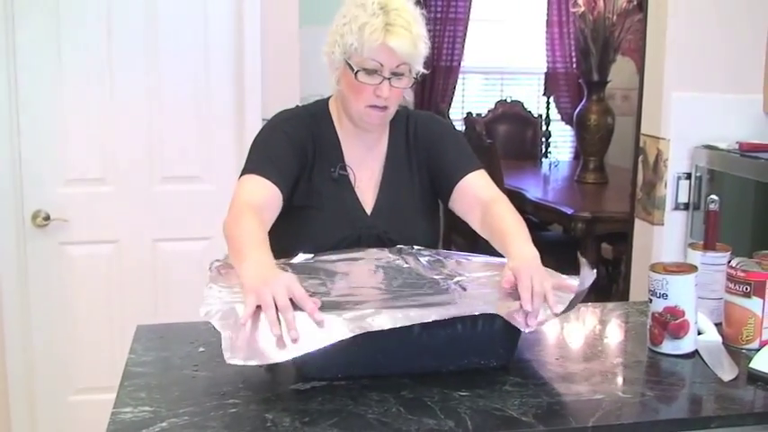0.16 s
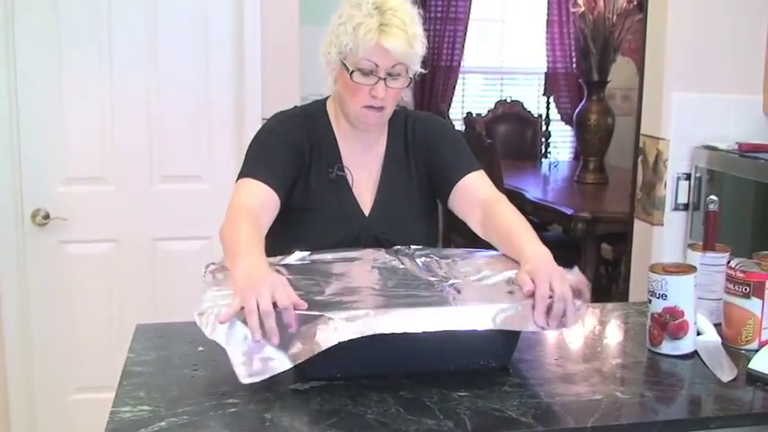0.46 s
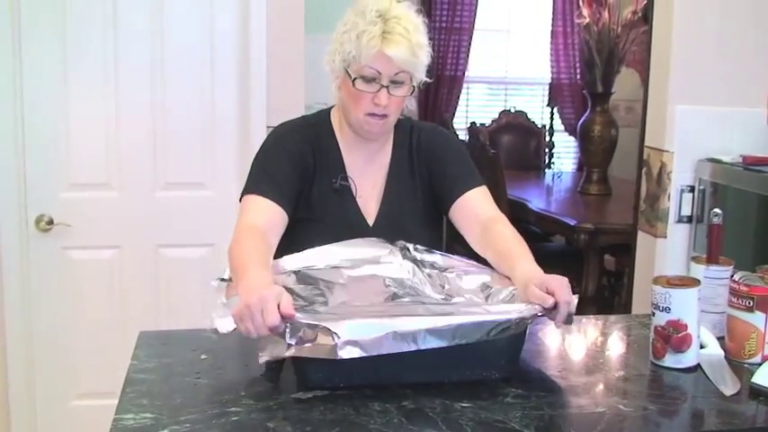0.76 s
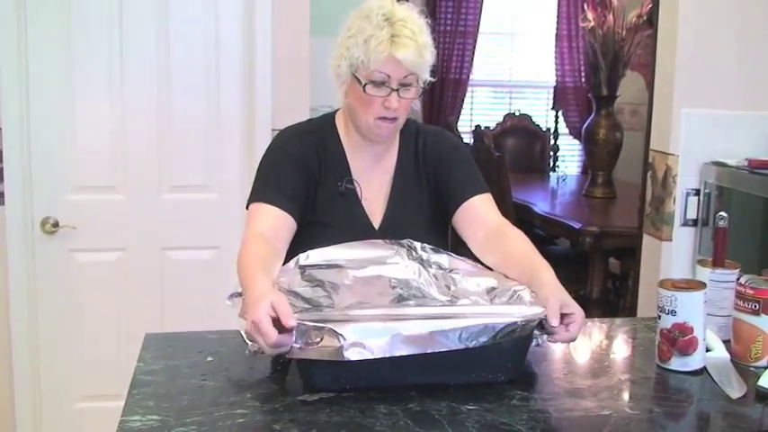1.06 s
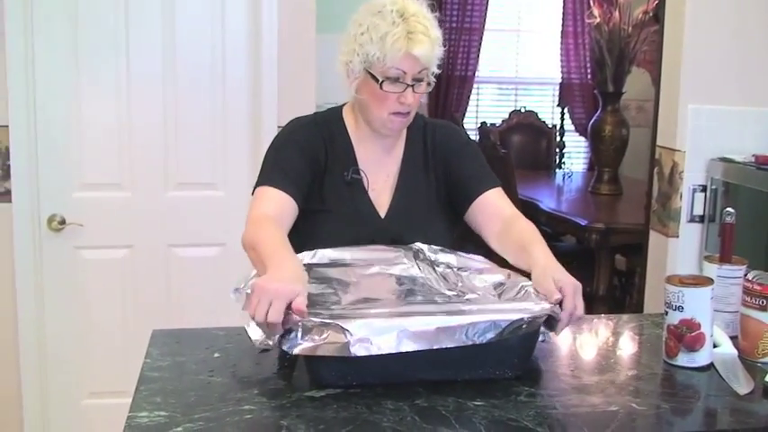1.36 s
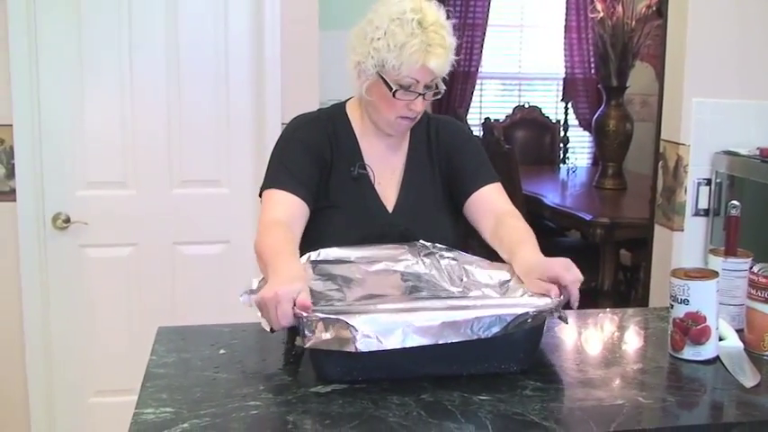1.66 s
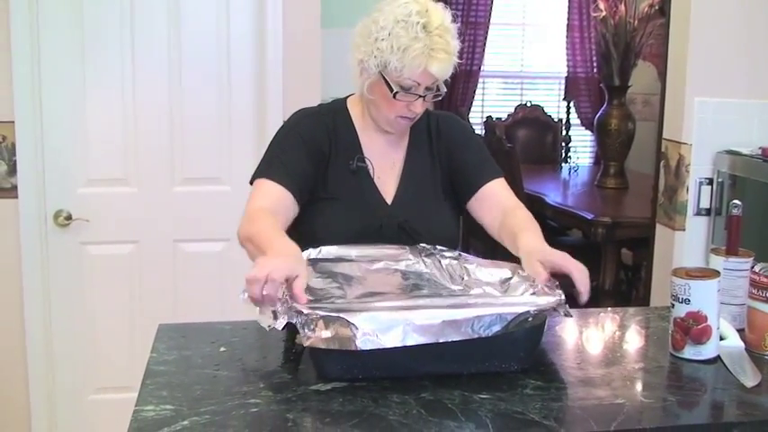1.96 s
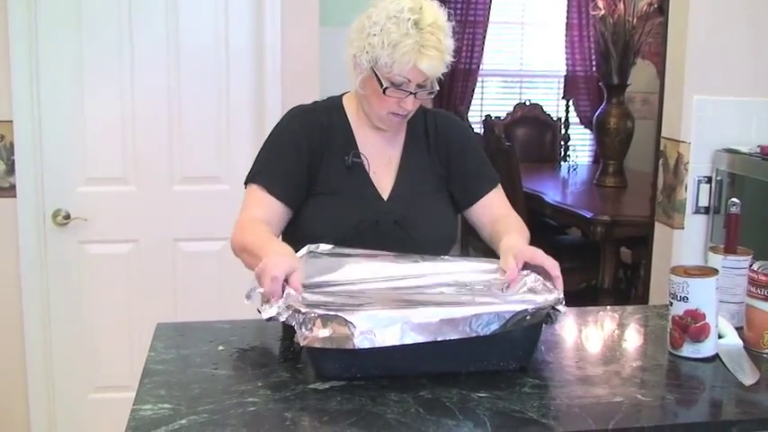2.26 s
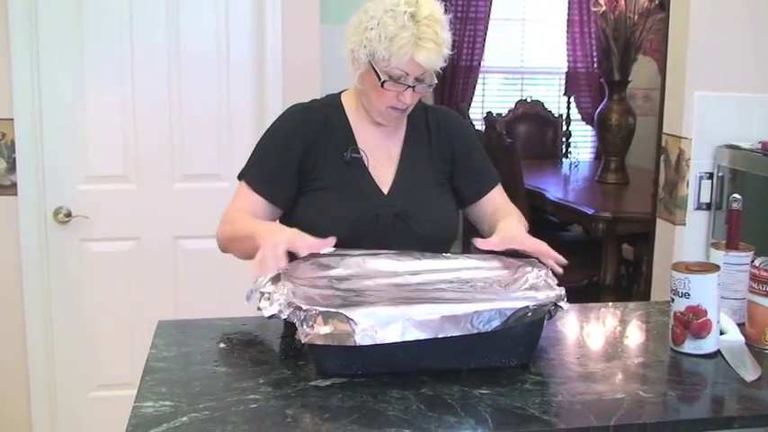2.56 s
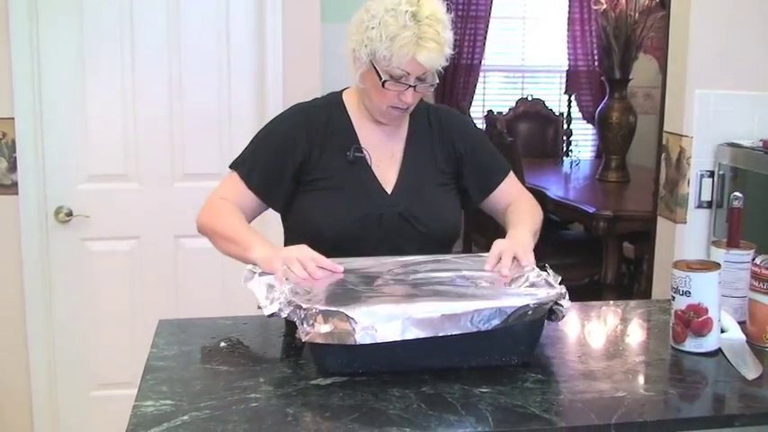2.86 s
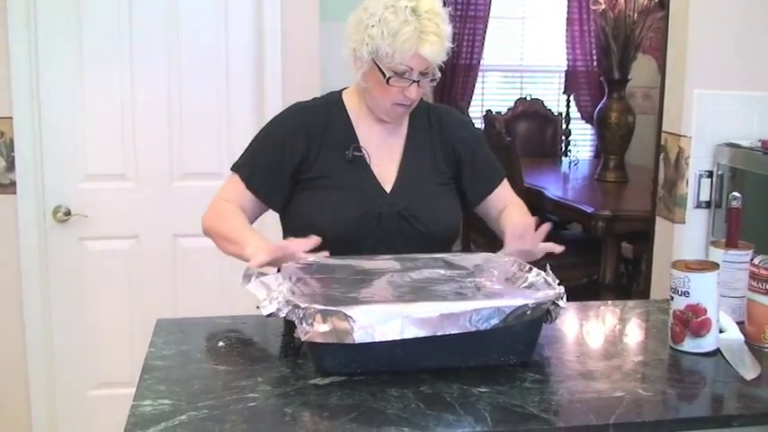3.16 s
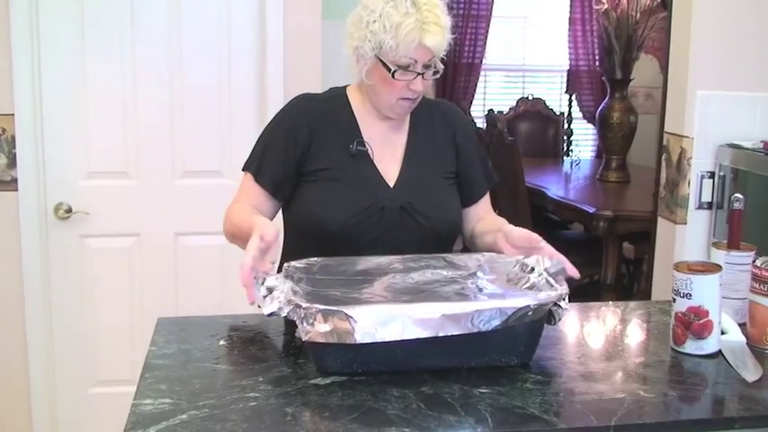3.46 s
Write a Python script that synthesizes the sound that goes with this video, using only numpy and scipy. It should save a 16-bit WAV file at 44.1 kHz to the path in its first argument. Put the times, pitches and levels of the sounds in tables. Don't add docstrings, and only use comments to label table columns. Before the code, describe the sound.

Foil rustles broadly, then snaps and crunches in shorter bursts as hands fold and crimp its edges, with faint low thuds of the pan, between brief pauses; lightly reverberant kitchen, distant camera microphone.

```python
import sys
import numpy as np
from scipy import signal
from scipy.fft import rfft, irfft, next_fast_len
from scipy.io import wavfile
from scipy.ndimage import uniform_filter1d, map_coordinates

SR = 44100
rng = np.random.default_rng(int(sys.argv[2]) if len(sys.argv) > 2 else 0)


def int16_out(signal):
    q = np.round(np.clip(np.atleast_2d(signal).T, -1, 1) * 32767)
    wavfile.write(sys.argv[1], SR, q.astype(np.int16))


def ratio(d):
    e = np.asarray(d, float) / 20
    return 10 ** e


N = 158760


def unit(x):
    return x / np.sqrt(np.mean(x ** 2) + 1e-20)


def along(points, hz):
    f, v = np.transpose(points)
    return np.interp(np.log(hz + 1), np.log(f + 1), v)


def wobble(rate):
    knots = rng.standard_normal(int(N * rate / SR) + 4)
    return map_coordinates(knots, [np.arange(N) * rate / SR])


def coloured(x, spectrum):
    m = next_fast_len(N + 8192)
    gain = ratio(along(spectrum, np.fft.rfftfreq(m, 1 / SR)))
    return unit(irfft(rfft(x, m) * gain, m)[:N])


def effort():
    # time in seconds, effort in dB,
    # crimped over loose foil in dB, edge brightness in dB.
    spread = [
        [(0.0, -22, -7, 4), (0.12, -26, -17, -3), (0.135, -23, -15, 1), (0.238, -21.5, -4, 7.3),
         (0.3, -25, -8, 4)],
        [(0.31, -24.5, -18, 4), (0.39, -19.5, -26, 1.5), (0.43, -28.5, -5, -2), (0.496, -24, -16, -6),
         (0.568, -18, -11, 4.5), (0.61, -28, 7, -4)],
        [(0.62, -19.5, -15, -4.5), (0.792, -17.5, -5, 4.5), (0.846, -23.5, -3, 4), (0.88, -21, -11, -11)],
        [(0.89, -24, 3, 0.5), (0.968, -17.5, -15, 2.5), (1.096, -28, -11, -6), (1.11, -52, 1, -8)],
    ]
    tuck = [
        [(1.12, -31, 2, -16), (1.138, -22.5, -5, -5), (1.158, -25, -13, -13), (1.203, -24.5, -5, -2)],
        [(1.21, -17, 1.5, 2), (1.24, -22, -1, 6), (1.3, -25.5, -3, -2.5), (1.374, -28, -4, -1),
         (1.39, -28, -9, -26)],
        [(1.395, -27, -19, -11), (1.399, -24, -2.5, -8.5), (1.683, -20.5, 0, -2), (1.69, -20.5, -2, -6)],
        [(1.7, -25, -3, -12), (1.706, -19, -2, -8), (1.81, -31, -1, 1), (1.835, -32, -5, -19),
         (1.89, -37, 10, -24)],
        [(1.9, -36, 4, 1), (1.918, -22.5, -2.5, -6), (2.034, -26, 4, -1), (2.09, -40, -5, -11)],
    ]
    fold = [
        [(2.1, -39, 6.9, -5), (2.122, -37.5, 9.8, -6), (2.162, -29, 11.5, 3), (2.184, -34.5, 12.5, 1),
         (2.196, -26.5, 8.4, 5)],
        [(2.202, -23, 8.7, 9), (2.23, -23, 6.4, 6), (2.302, -18.5, 4.5, 4), (2.39, -33.5, 6.8, 2.5)],
        [(2.4, -22, 1.6, -10), (2.465, -23.5, 3.1, -0.5), (2.498, -25.5, 10.3, 11.5), (2.53, -32.5, 10.5, 5),
         (2.62, -52, 9.5, -2), (2.72, -81, 6, 1)],
    ]
    crimp = [
        [(2.724, -38, 3.8, -20), (2.78, -22.5, 7.9, 8.2), (2.91, -23.5, 4.9, 1)],
        [(2.915, -24.5, 9.1, 3.1), (3.033, -21, 5.4, 4.1), (3.14, -30, 7.8, 2.6)],
        [(3.15, -23.5, 4.1, -1.5), (3.192, -25, 9.2, 11), (3.272, -37, 10.8, 6), (3.3, -41, 8, -6),
         (3.4, -52.5, 6, -14)],
        [(3.406, -40, 11, 3), (3.432, -32, 10, 7), (3.48, -29.5, 9.8, 4.9), (3.6, -40.5, 15.2, 1)],
    ]
    rows = np.concatenate([np.array(move) for move in (*spread, *tuck, *fold, *crimp)])
    s, *columns = rows.T
    order = np.argsort(s)
    return [np.interp(np.arange(N) / SR, s[order], column[order]) for column in columns]


def pops():
    count, cycles = 24000, 1.66
    size_scatter_db, clump_db, hiss_db = 2, 0.57, 0
    when, pitch, size, life = rng.random((count, 4)).T
    hz = 250 * 64 ** pitch
    t = np.arange(160) / SR
    decay = np.pi * hz / (cycles * (1.3 + life * 2))
    ring = np.sin(2 * np.pi * hz[:, None] * t) * np.exp(-t * decay[:, None])
    ring *= (hz * ratio(-size_scatter_db * np.log(1.01 - size)))[:, None]
    at = (when * N).astype(int)[:, None] + np.arange(len(t))
    crackle = unit(np.bincount(at.ravel(), ring.ravel(), N + len(t))[:N])
    clumps = ratio(clump_db * (0.5 * wobble(60) + wobble(300)))
    return clumps * (crackle + ratio(hiss_db) * rng.standard_normal(N))


def patchy(x):
    patch_db, from_hz = 1.03, 400
    hz, _, z = signal.stft(x, SR, nperseg=256)
    field = uniform_filter1d(rng.standard_normal(z.shape), size=5, axis=0)
    field = uniform_filter1d(field, size=9, axis=1)
    colour_db = patch_db * unit(field) * np.minimum(hz / from_hz, 1)[:, None]
    return signal.istft(z * ratio(colour_db), nperseg=256)[1][:N]


def flurries():
    # start in seconds, peak in
    # dB, t60 in seconds, edge brightness in dB.
    folds_giving_way = [(0.0994, -15, 0.16, -3), (0.1283, -11.5, 0.14, 12), (0.1994, -15, 0.1, 3),
                        (0.2249, -16, 0.12, 8), (0.269, -4, 0.088, 3), (0.3044, -8.5, 0.13, 2),
                        (0.3394, -14, 0.12, 3), (0.3744, -14, 0.16, -2), (0.4144, -12.5, 0.12, 9),
                        (0.443, -6, 0.1, 12), (0.4774, -10, 0.13, 6), (0.5234, -7, 0.16, 9),
                        (0.5644, -14, 0.11, -1), (0.6194, -18, 0.13, -3), (0.6794, -26, 0.14, -9),
                        (0.751, -6.5, 0.089, 6), (0.7794, -12, 0.12, 3), (0.8294, -3.5, 0.14, 8),
                        (0.922, -1.5, 0.11, 4), (0.9555, 0, 0.15, 3), (1.0044, -3, 0.13, 12.5),
                        (1.044, -3.5, 0.1, -3), (1.0914, -10.5, 0.079, 9), (1.1354, -17, 0.12, 5),
                        (1.1714, -15, 0.12, 9), (1.1894, -13, 0.12, 3), (1.2244, -10, 0.1, 3),
                        (1.2594, -15, 0.17, 14), (1.312, -5.5, 0.11, 10), (1.3634, -13, 0.1, 3),
                        (1.3992, -7, 0.14, 11), (1.426, -4.5, 0.078, 13), (1.4694, -32, 0.12, -2),
                        (1.5136, -5, 0.12, 4), (1.5444, -10, 0.23, 0), (1.6344, -12, 0.092, 12),
                        (1.6594, -16, 0.12, 12), (1.7474, -28, 0.059, 9), (1.7794, -18, 0.12, 0),
                        (1.8404, -10, 0.12, -3), (1.9031, -11, 0.15, -2), (1.9394, -17, 0.09, 6),
                        (1.9629, -3, 0.15, -5), (2.011, -6, 0.094, 7), (2.1031, -10, 0.12, 3),
                        (2.1321, -4, 0.12, 5), (2.1904, -14, 0.11, 3), (2.2084, -3, 0.11, 18),
                        (2.2494, -2, 0.16, 0), (2.4034, -12, 0.14, -2), (2.4264, -1, 0.088, -4),
                    (2.472, 4.5, 0.089, 4), (2.5974, -14, 0.13, 3), (2.7247, -22, 0.11, 0),
                    (2.7474, -15, 0.12, 0), (2.758, -4, 0.095, -1), (2.7781, -7, 0.053, -2),
                    (2.8385, 4.5, 0.057, 3), (2.9228, -4, 0.14, 5), (3.0494, -1, 0.1, 3),
                    (3.1664, -3, 0.085, 3), (3.1834, 0, 0.096, 3), (3.2144, -21, 0.08, -2),
                    (3.4072, -22, 0.12, 0), (3.4196, -12, 0.12, -2), (3.4694, -16, 0.08, 8)]
    level_db, rise_s = -17, 0.0019
    edge_haste = 1.35
    gain, t = np.zeros((2, N + SR)), np.arange(SR // 4) / SR
    for s, db, t60, bright_db in (*folds_giving_way,):
        fall_db = -60 * t / max(t60, 0.02)
        rush = ratio([fall_db, bright_db + edge_haste * fall_db])
        onset = 1 - np.exp(-t / rise_s)
        gain[:, round(s * SR):][:, :len(t)] += ratio(db + level_db) * onset * rush
    return gain[:, :N]


def foil(effort_db, crimp_db, bright_db):
    # frequency in Hz, level in dB per Hz.
    loose_colour = [(88, -61), (150, -17), (381, -8.5), (520, -1), (1600, -4), (2150, -2), (3160, -5.5),
                    (9390, -7), (15600, -17)]
    # frequency in Hz, level in dB per Hz.
    tight_colour = [(88, -53), (150, -11.5), (500, -1.5), (1200, -3), (2200, 2.5), (4400, 4), (6500, -0.5),
                    (9000, -12.5), (13000, -12.5), (15600, -33)]
    # resonance in Hz, width in Hz, lift in dB.
    pan_air = [(523, 15, 6), (1970, 163, 3)]
    level_db = -1.5
    edge_hz = 7140
    body_hz, thinning = 595, 0.85
    steady_thinning = 0.31

    f = np.fft.rfftfreq(N, 1 / SR)
    hollow = ratio(sum(db / (1 + (2 * (f - hz) / width) ** 2) for hz, width, db in pan_air))
    loose = irfft(rfft(coloured(pops(), loose_colour)) * hollow, N)
    both = patchy(loose + ratio(crimp_db) * coloured(pops(), tight_colour))
    edge = irfft(rfft(both) / (1 + (edge_hz / (f + 1)) ** 3), N)
    body = irfft(rfft(both) / (1 + (f / body_hz) ** 4), N)

    rush, rush_edge = flurries() / np.hypot(1, 1.6 * ratio(crimp_db))
    steady = ratio(effort_db + level_db)
    lost_body = (1 - ratio(-thinning * np.maximum(crimp_db, 0))) * body
    main = (steady + rush) * (both - edge)
    bright = (steady * ratio(bright_db) + rush_edge) * edge
    return main + bright - (rush + steady_thinning * steady) * lost_body


def snaps():
    # start in seconds, peak in dB, pitch in Hz.
    creases = [(0.2244, -4, 1820), (0.4476, 2, 1870), (1.0054, -4, 1850), (1.1372, 0, 2150),
               (1.1547, 2, 2420), (1.173, 3, 2330), (1.313, -3, 2590), (1.3992, -4, 3550),
               (1.7064, 7.5, 3200), (1.749, -2.5, 11000), (1.8412, -6, 10000), (1.9035, -10, 11000),
               (1.9639, 10.5, 2420), (2.0102, -1, 2470), (2.1035, -8, 7500), (2.2284, -4, 6340),
               (2.598, -13, 9000), (2.724, -18, 2110), (2.7593, 2, 5330), (2.7772, 12, 4240),
               (2.845, 0, 4450), (2.949, -1, 3800), (3.1592, 2.5, 1800), (3.4075, -11, 5470)]
    level_db, t60_s, rise_s = -10.5, 0.012, 0.00095
    pitch_width, skirt = 0.32, 0.26
    out, t = np.zeros(N + SR), np.arange(SR // 20) / SR
    f = np.fft.rfftfreq(len(t), 1 / SR)
    for s, db, hz in creases:
        peak = np.exp(-(np.log((f + 1) / hz) / pitch_width) ** 2)
        broad = skirt * (f > 300) * (f < 2 * hz)
        crack = irfft(rfft(rng.standard_normal(len(t))) * (peak + broad), len(t))
        envelope = ratio(db + level_db - 60 * t / t60_s) * (1 - np.exp(-t / rise_s))
        out[round(s * SR):][:len(t)] += envelope * unit(crack)
    return out[:N]


def tail(x, decay, delay_s):
    delayed = np.pad(x, (int(delay_s * SR), 0))[:N]
    hz, t, z = signal.stft(delayed, SR, nperseg=256)
    keep = ratio(-120 * t[1] / np.maximum(along(decay, hz), 0.01))
    power = uniform_filter1d(np.abs(z) ** 2, size=3, axis=0)
    stored = np.array([signal.lfilter([1 - k], [1, -k], p) for k, p in zip(keep, power)])
    noise = signal.stft(rng.standard_normal(N), SR, nperseg=256)[2]
    gain = np.sqrt(np.abs(stored) / np.mean(np.abs(noise) ** 2))
    return signal.istft(noise * gain, SR, nperseg=256)[1][:N]


def shimmer(dry):
    # frequency in Hz, t60 in seconds.
    sheet_ringing = [(300, 0.092), (3000, 0.21), (12000, 0.027)]
    return ratio(-4.5) * tail(dry, sheet_ringing, delay_s=0.0015)


def thuds(effort_db):
    # frequency in Hz, level in dB per Hz.
    counter_colour = [(13, -30), (22, 4), (111, 4), (181, -5), (300, -1.5), (390, -3), (660, -120)]
    # start in seconds, peak in dB.
    landings = [(0.499, -35), (1.162, -28), (1.219, -30), (1.649, -31), (1.999, -28), (2.119, -31),
                (2.195, -23), (2.279, -29), (2.782, -18), (2.899, -32), (3.039, -35), (3.168, -45),
                (3.427, -38)]
    level_db, growth, uneven_db = -46.5, 0.23, 2.2
    bump_db, rise_s, fall_s = -0.5, 0.015, 0.023
    gain = ratio(level_db + growth * (effort_db - effort_db.max()) + uneven_db * wobble(5.9))
    for s, db in landings:
        t = np.maximum(np.arange(N) / SR - s, 0)
        gain = gain + ratio(db + bump_db) * (1 - np.exp(-t / rise_s)) * np.exp(-t / fall_s)
    return gain * coloured(rng.standard_normal(N), counter_colour)


def kitchen(sheet):
    # frequency in Hz, t60 in seconds.
    room_decay = [(200, .4), (700, 0.77), (2000, 0.52), (4500, 0.31), (8000, 0.26), (13000, 0.14)]
    return ratio(-8.5) * tail(sheet, room_decay, delay_s=0.0095)


def room_tone():
    # frequency in Hz, level in dB per Hz.
    air_colour = [(15, -34), (25, 3.5), (120, -12), (500, -9), (3500, -23), (15500, -31)]
    return ratio(-47) * coloured(rng.standard_normal(N), air_colour)


def scene():
    effort_db, crimp_db, bright_db = effort()
    dry = foil(effort_db, crimp_db, bright_db) + snaps()
    sheet = dry + shimmer(dry)
    return (sheet + kitchen(sheet) + thuds(effort_db) + room_tone())[None]


def top_cut(x):
    return signal.sosfilt(signal.butter(12, 15700, fs=SR, output="sos"), x)


def record(dry):
    top_hz = 15780
    held = dry / (1 + np.abs(dry / 0.9) ** 5) ** (1 / 5)
    limited = irfft(rfft(held) * (np.fft.rfftfreq(N, 1 / SR) < top_hz), N)
    return top_cut(limited)


dry = scene()
out = record(dry)
int16_out(out)
```